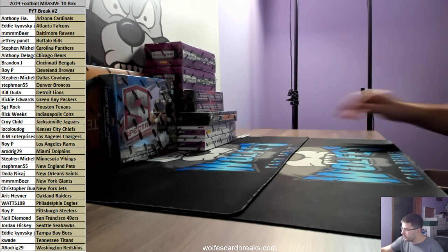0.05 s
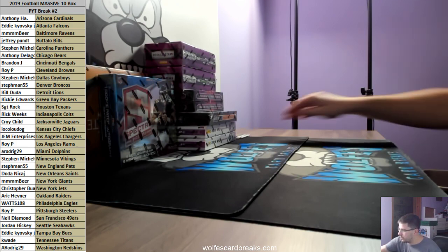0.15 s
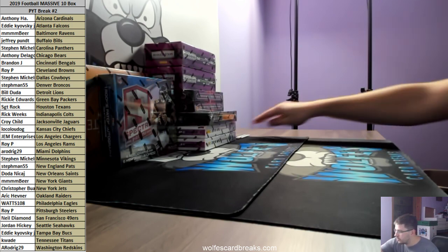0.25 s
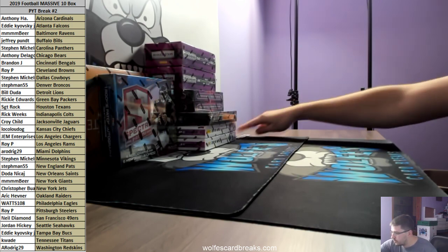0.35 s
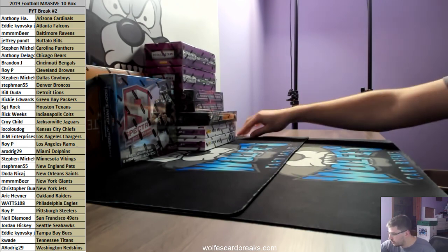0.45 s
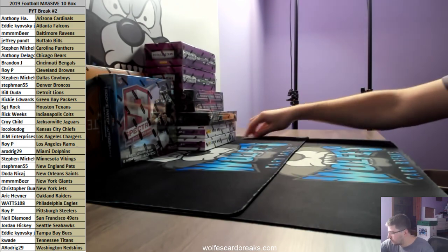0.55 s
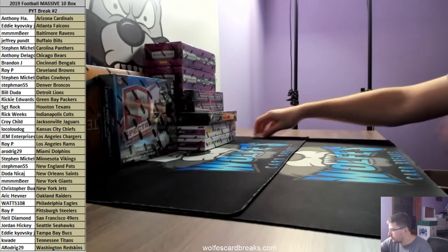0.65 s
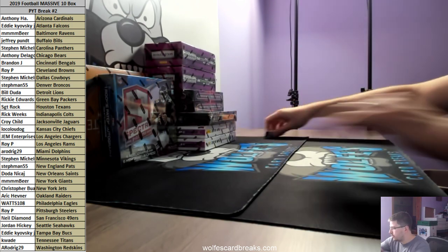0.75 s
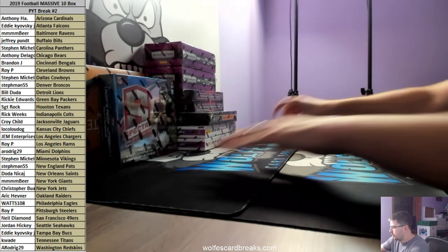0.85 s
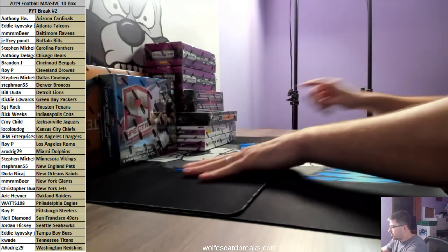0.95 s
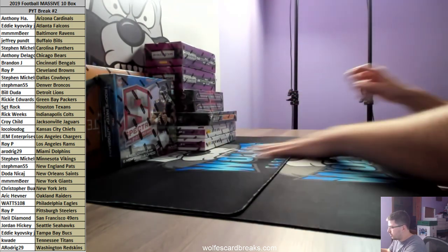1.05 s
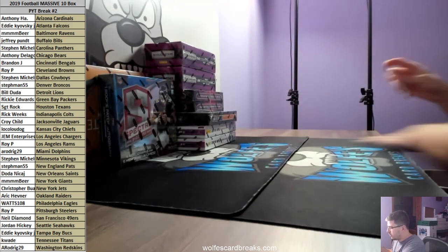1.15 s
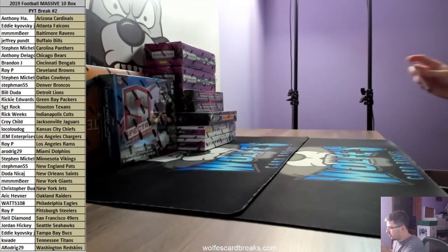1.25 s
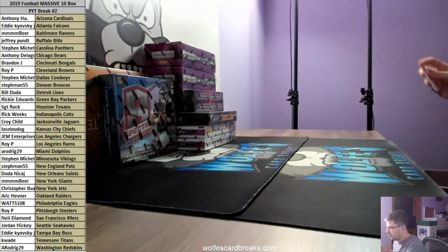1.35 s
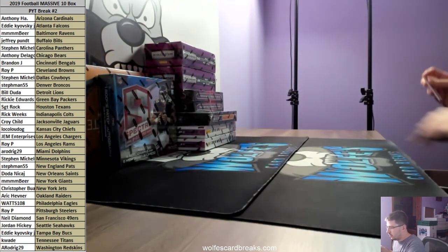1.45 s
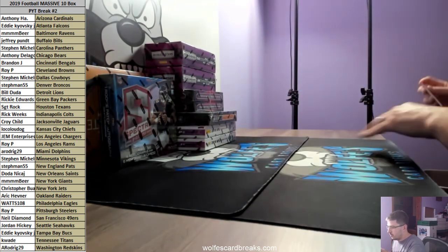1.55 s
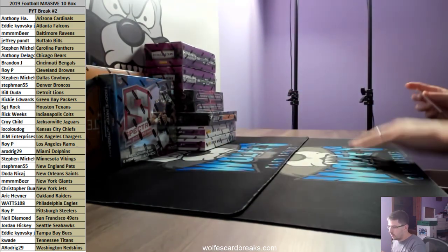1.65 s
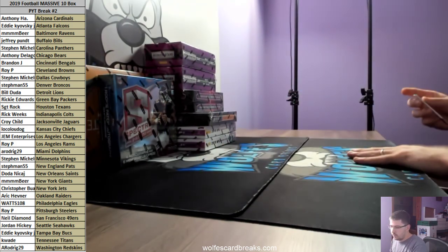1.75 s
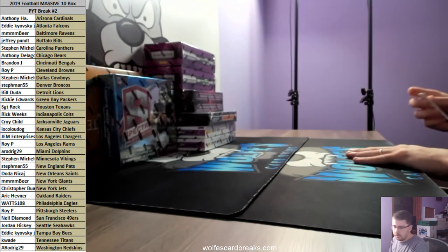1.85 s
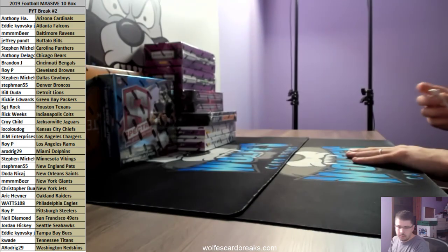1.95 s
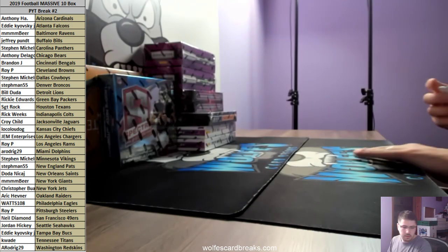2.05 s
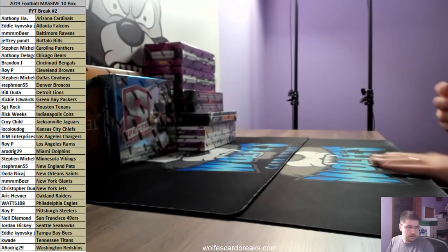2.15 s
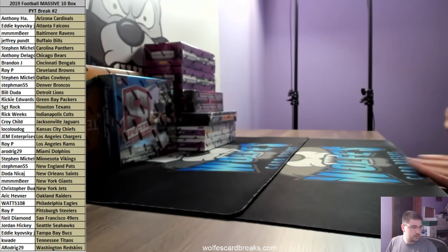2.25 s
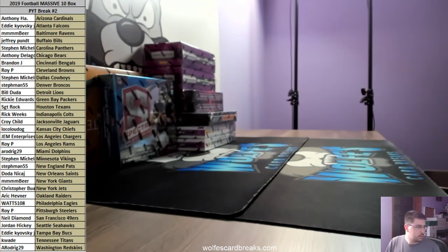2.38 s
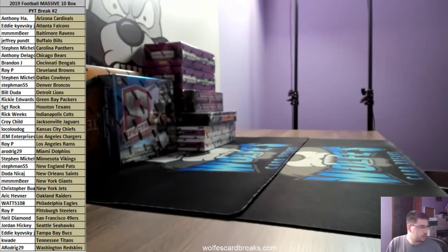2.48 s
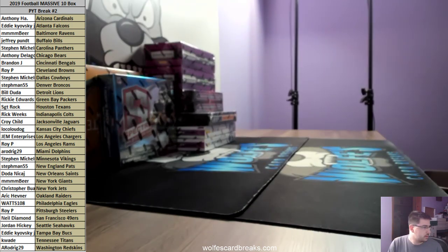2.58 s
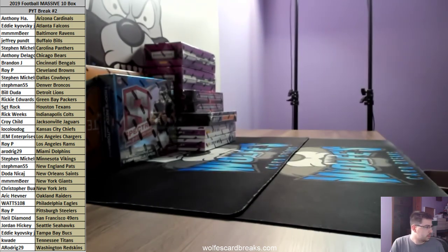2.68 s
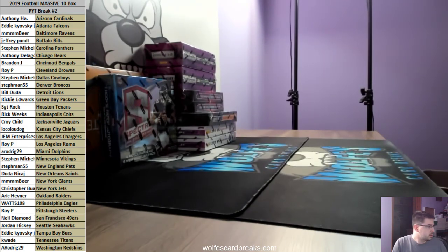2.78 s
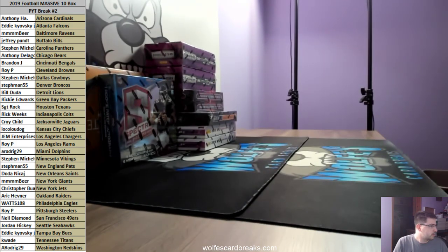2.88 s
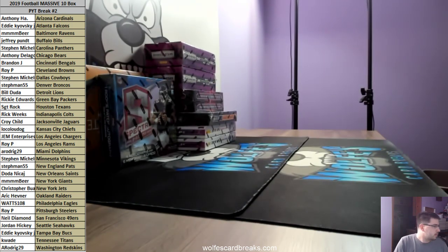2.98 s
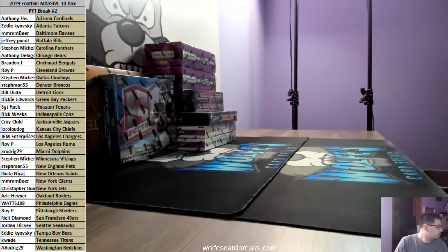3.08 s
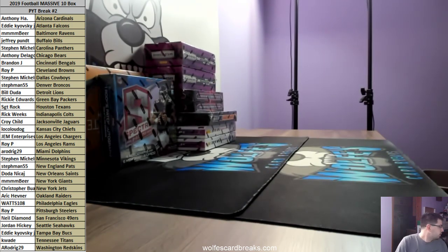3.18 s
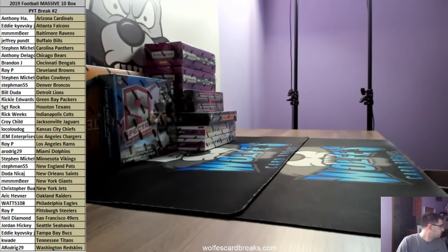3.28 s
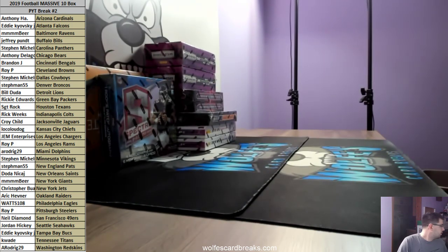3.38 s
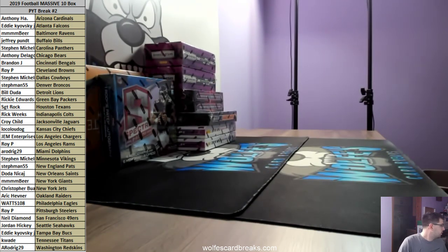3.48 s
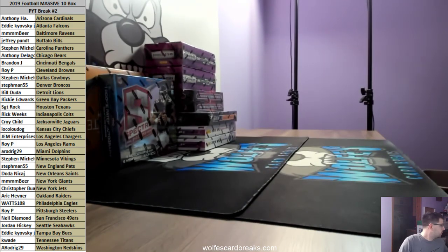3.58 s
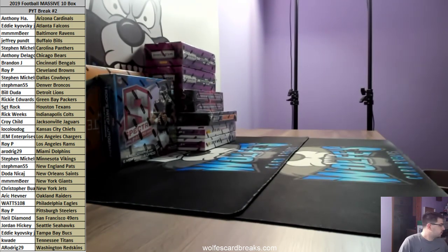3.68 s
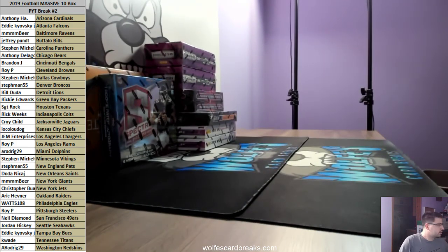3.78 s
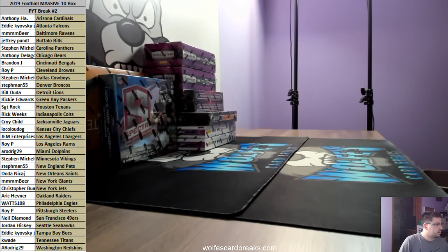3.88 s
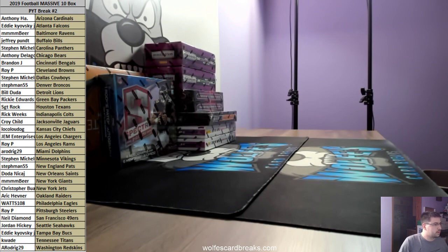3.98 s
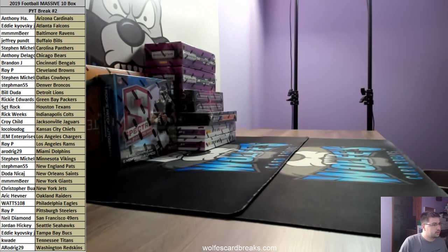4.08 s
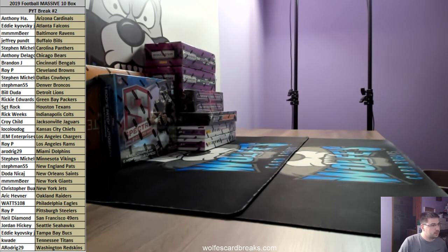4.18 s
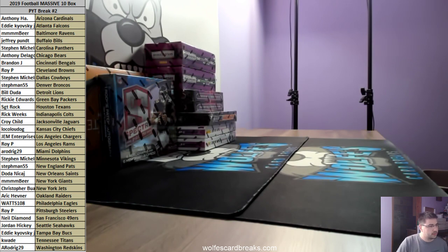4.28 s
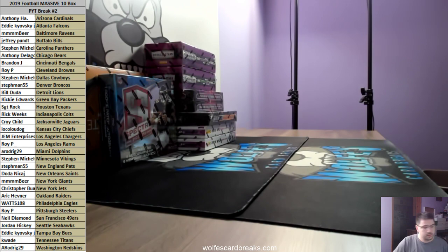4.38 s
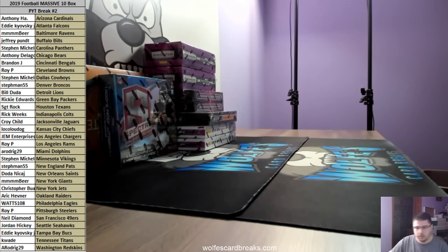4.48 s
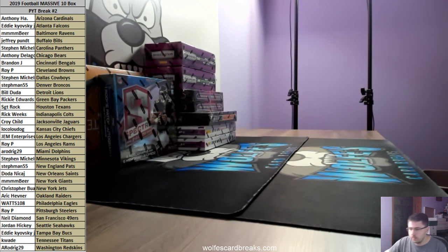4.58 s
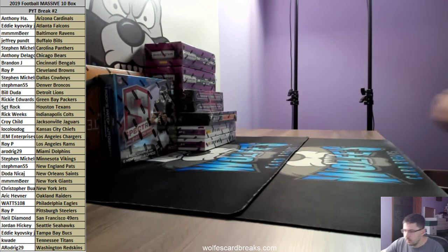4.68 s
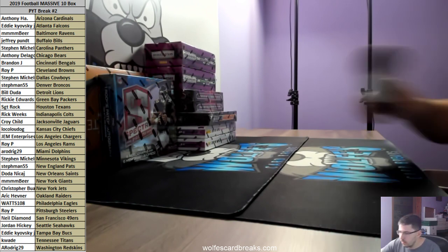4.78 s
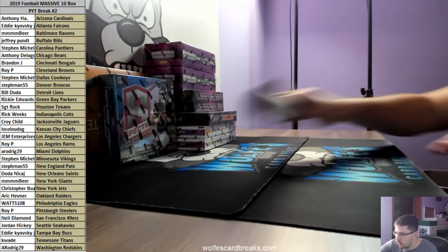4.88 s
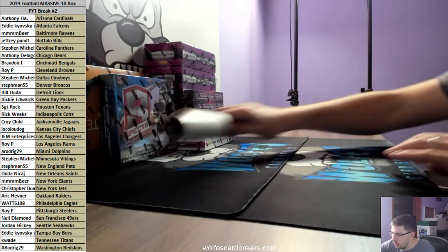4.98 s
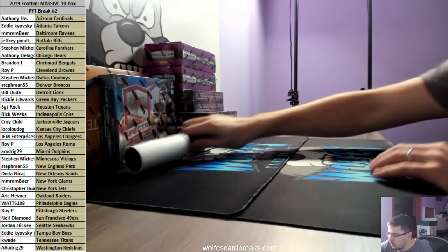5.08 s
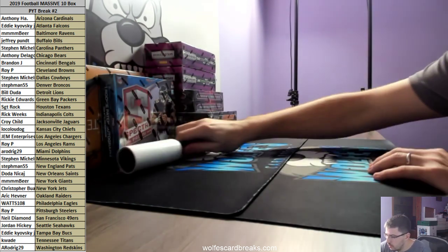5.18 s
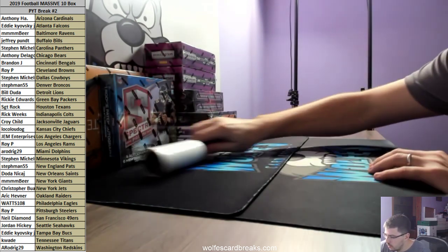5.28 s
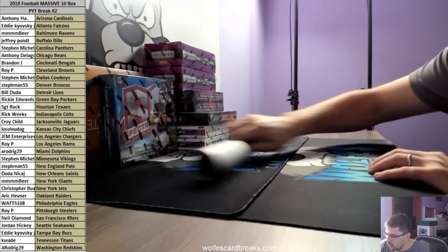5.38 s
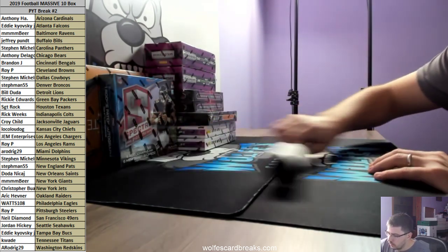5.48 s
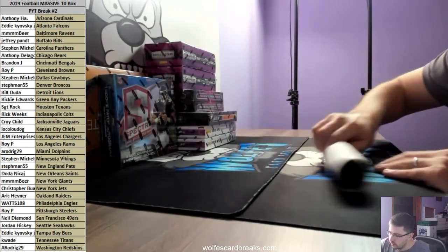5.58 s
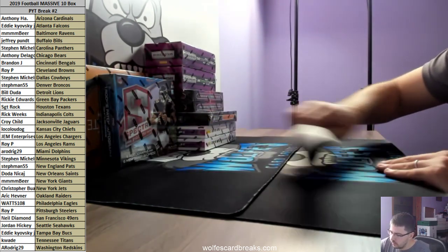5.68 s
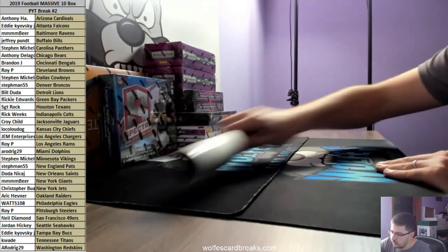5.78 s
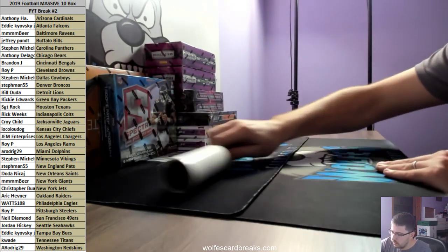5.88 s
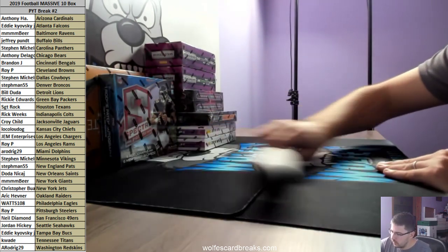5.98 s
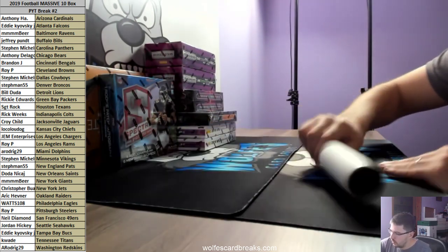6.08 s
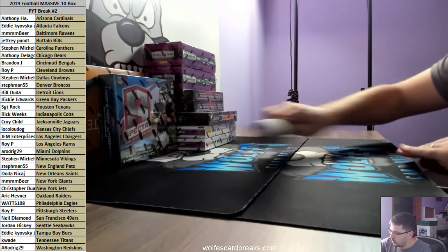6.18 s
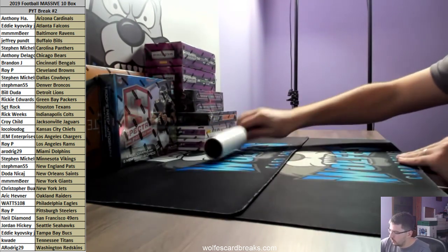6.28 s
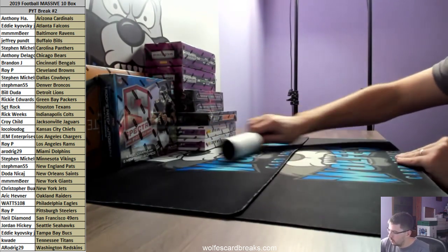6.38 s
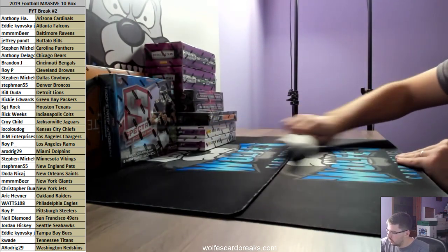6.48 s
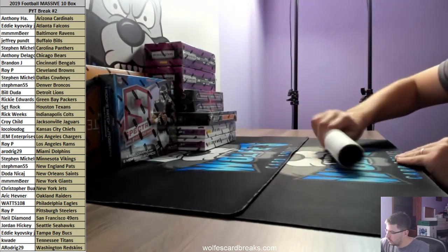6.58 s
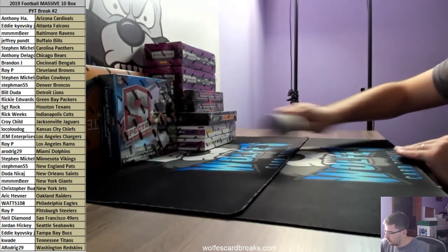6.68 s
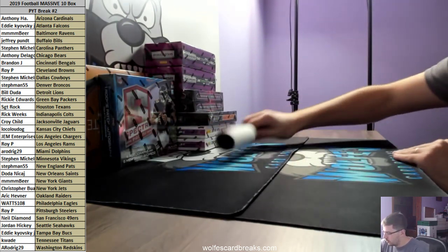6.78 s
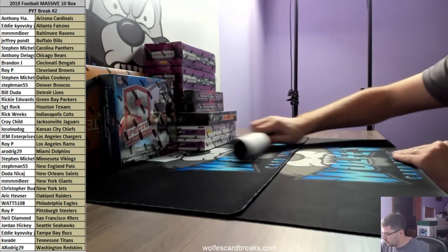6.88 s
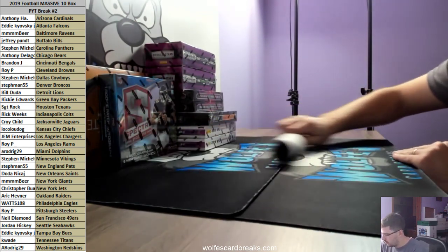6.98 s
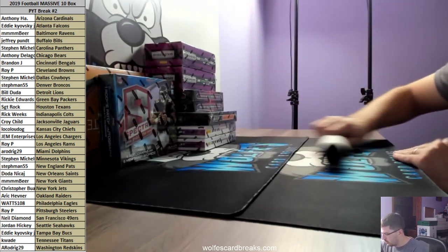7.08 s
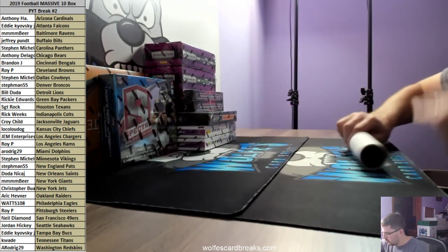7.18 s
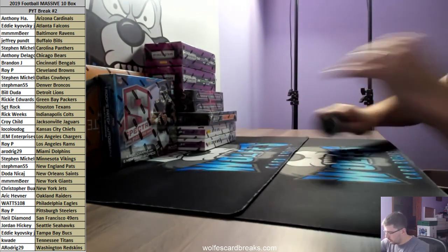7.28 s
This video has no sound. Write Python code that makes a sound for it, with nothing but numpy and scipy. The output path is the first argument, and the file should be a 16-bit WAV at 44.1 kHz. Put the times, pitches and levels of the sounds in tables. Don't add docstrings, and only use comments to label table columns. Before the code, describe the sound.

In a small room with a faint fan hum, hands tidy a cloth mat on a wooden table: light rubs, small ticks, low thumps and one quick palm sweep. After a quieter pause, a sticky roller lands with a clatter and makes four short rasping passes, glue crackling off the cloth, its plastic frame ticking and the table thudding at each bump. A close microphone stands on the table.

```python
import sys
import numpy as np
from scipy import signal
from scipy.fft import rfft, irfft, next_fast_len
from scipy.io import wavfile
from scipy.ndimage import uniform_filter1d

SR = 44100
rng = np.random.default_rng(int(sys.argv[2]) if len(sys.argv) > 2 else 0)


def gain_from_db(level_db):
    decades = np.asarray(level_db, float) / 20
    return 10 ** decades


def digitize_waveform(pressure):
    field = np.atleast_2d(pressure).T
    bounded = np.clip(field, -1, 1)
    quanta = np.round(bounded * 32767).astype(np.int16)
    wavfile.write(sys.argv[1], SR, quanta)


N = 323694


def rms_one(x):
    return x / np.sqrt(np.mean(x ** 2) + 1e-20)


def in_time(rows, silent_db=-110):
    s, *columns = np.transpose(rows)
    now = np.arange(N) / SR
    return [np.interp(now, s, column, left=silent_db, right=silent_db) for column in columns]


def coloured(x, points):
    size = next_fast_len(N)
    hz = np.maximum(np.arange(size // 2 + 1) * SR / size, 1)
    points_hz, points_db = np.array(points).T
    shape_db = np.interp(np.log(hz), np.log(points_hz), points_db)
    return rms_one(irfft(rfft(x, size) * gain_from_db(shape_db), size)[:N])


def band(x, low_hz, high_hz):
    edges = [low_hz, min(high_hz, SR / 2.2)]
    return signal.sosfilt(signal.butter(2, edges, "band", fs=SR, output="sos"), x)


def without_lows(x, edge_hz):
    total, at, half = np.cumsum(x), np.arange(N), SR / edge_hz / 2
    ahead = np.interp(at + half - .5, at, total)
    behind = np.interp(at - half - .5, at, total)
    return x - (ahead - behind) / (2 * half)


def drift(rate_hz):
    r = np.exp(-2 * np.pi * 20 * rate_hz / SR)
    slow = signal.lfilter([1], [1, -2 * r, r * r], rng.standard_normal(N // 20 + 1001))[1000:]
    return np.interp(np.arange(N) / 20, np.arange(len(slow)), rms_one(slow))


def ring(x, hz, t60):
    r, w = gain_from_db(-60 / (t60 * SR)), 2 * np.pi * hz / SR
    return signal.lfilter([0, np.sin(w)], [1, -2 * r * np.cos(w), r * r], x + 1e-18)


def stroke(row, attack_s, sag_db, release_db_per_s, top_db, top_fade_db, rumble_db):
    start, fastest, lift, db, softer_db = row
    let_go_db, settle_db_per_s = 23, 148
    gentle, sagged = db - softer_db, db - sag_db
    settled = sagged - let_go_db
    gone = lift + let_go_db / release_db_per_s
    return [(start, gentle - 18, gentle - 10 + top_db - top_fade_db, rumble_db + 5),
            (start + attack_s, gentle, gentle + top_db, rumble_db),
            (fastest, db, db + top_db, rumble_db),
            (lift, sagged, sagged + top_db, rumble_db),
            (gone, settled, settled + top_db - top_fade_db / 2, rumble_db - 5),
            (gone + 25 / settle_db_per_s, settled - 25, settled - 25 + top_db - top_fade_db, rumble_db - 31)]


def friction(strokes, spectrum, path, per_s, spread_db, clump_db, echo):
    sizes = gain_from_db(spread_db * np.minimum(rng.exponential(1, N), 5)) * rng.choice([-1, 1], N)
    snaps = coloured(sizes * (rng.random(N) < per_s / SR), spectrum)
    at = np.arange(N)
    path_s, path_lag_ms, path_edge_hz = np.transpose(path)
    lag_ms = np.interp(at / SR, path_s, path_lag_ms)
    snaps = without_lows(snaps, np.interp(at / SR, path_s, path_edge_hz))
    late = at - lag_ms * (1 + .035 * drift(10)) * SR / 1000
    dulled = uniform_filter1d(snaps, size=3)
    snaps = snaps + echo * gain_from_db(2 * drift(17)) * np.interp(late, at, dulled)
    snaps = snaps - echo * .4 * np.interp(2.7 * late - 1.7 * at, at, snaps)
    low = signal.sosfiltfilt(signal.butter(2, 5500, fs=SR, output="sos"), snaps)
    curves = [in_time(touch) for touch in strokes]
    hiss_level, top_level = sum(gain_from_db(c[0]) for c in curves), sum(gain_from_db(c[1]) for c in curves)
    hiss = hiss_level * gain_from_db(clump_db * drift(51)) * rms_one(low)
    top = top_level * gain_from_db(clump_db * drift(17)) * rms_one(snaps - low)
    rumble = sum(gain_from_db(c[2] - 6) for c in curves)
    return hiss + top, rumble


# (sets off [s], fastest [s], lifts [s], hiss [dB], softer at the start by [dB])
ROLLER_PASSES = [
    (5.168, 5.439, 5.563, -39.5, 15.5),
    (5.862, 5.978, 6.044, -38, 7),
    (6.318, 6.469, 6.54, -45, 13.5),
    (6.822, 7.024, 7.156, -44.5, 11.5),
]
# (pitch [Hz], level [dB per Hz])
GLUE_COLOUR = [(350, -7), (600, -6), (869, -1), (1010, -6), (1400, 2), (2600, 0), (4460, 0.5), (5400, -2),
               (8860, -0.5), (9890, -6), (14100, -2.5), (16000, -9)]
ROLLER_ECHO_MS = (0.42, 0.822, 1.12)
ROLLER_EDGE_HZ = (2180, 1150, 2020)


def roller_peeling():
    passes = [stroke(row, attack_s=0.027, sag_db=3, release_db_per_s=238, top_db=-0.5, top_fade_db=30,
                     rumble_db=-45.5) for row in ROLLER_PASSES]
    path = [point for row in ROLLER_PASSES for point in zip(row[:3], ROLLER_ECHO_MS, ROLLER_EDGE_HZ)]
    return friction(passes, GLUE_COLOUR, path, per_s=12000, spread_db=2.8, clump_db=1.1, echo=.5)


# (time [s], legs [dB], panel [dB], upper panel [dB], edge [dB])
THUMPS = [(0.386, -63.5, -46.5, -62, -71.5), (0.459, -58, -36, -37, -56), (0.717, -52.5, -38, -50, -50),
          (0.914, -37, -37, -44, -53), (1.709, -40.5, -43.5, -64.5, -72.5), (1.743, -45, -44.5, -70, -72),
          (2.134, -45, -46.5, -67, -66), (2.868, -37, -37, -51, -29.5), (3.082, -41.5, -35, -47, -26),
          (4.442, -76, -92, -44.5, -39), (4.891, -70, -65, -49.5, -61), (5.0805, -42, -28.5, -29.5, -34),
          (5.107, -37.5, -36, -42, -26), (5.316, -64, -34, -39.5, -66.5), (5.335, -44, -37, -37, -72),
          (5.481, -30.5, -27, -7.5, -14), (5.8126, -37.5, -22, -19.5, -33), (5.987, -37, -28.5, -13.5, -24),
          (6.258, -38.5, -42, -38, -35.5), (6.2843, -46, -28.5, -23.5, -36),
          (6.4825, -31, -22.5, -7.5, -11), (6.736, -38, -33, -78, -44), (6.813, -39, -25.5, -23.5, -35),
          (7.0, -32.5, -28, -12.5, -22)]
PART_HZ = (65, 145, 240, 600)
PART_DB = (12, 16.5, 0, 5)
# (pitch [Hz], level [dB], time to fall 60 dB [s])
TABLE_NOTES = [(64.7, -35, 1.7), (145, -1.5, 0.45), (215.7, -3.5, 0.27), (276.3, -7, 0.32),
               (326.2, -12.5, 0.32), (371.7, -18, 0.4), (425.8, -15, 0.27), (515, -18, 0.21),
               (580, -19, 0.058), (798, -22.5, 0.089), (984, -29, 0.13), (1040, -19, 0.055),
               (547, -20, 0.24), (630, -26, 0.19)]
# (lag [s], share [1])
REBOUNDS = [(.0184, .2), (.026, .45), (.0323, .18), (.040, .26), (.043, -.15), (.0545, .17), (.073, .09)]


def table(rumble):
    mat_t60_s = .22
    rows, out = np.array(THUMPS), np.zeros(N)
    at = np.round((rows[:, 0] + .001) * SR).astype(int)
    scatter_db = 1.5 * rng.standard_normal((len(rows), len(TABLE_NOTES)))
    noise = rng.standard_normal(N)
    settling = gain_from_db(-60 / (.22 * SR))
    for k, (hz, level_db, t60) in enumerate(TABLE_NOTES):
        place_db = np.array([np.interp(np.log(hz), np.log(PART_HZ), row + PART_DB) for row in rows[:, 1:]])
        blows = np.zeros(N)
        blows[at] = -gain_from_db(place_db + level_db - 10.5 + scatter_db[:, k])
        judder = gain_from_db(-33.5) * signal.lfilter([1], [1, -settling], blows + 1e-18)
        shaking = np.roll(noise, 997 * k) * (judder + gain_from_db(level_db - 26.5) * rumble)
        out += ring(blows + shaking, hz, min(0.75 * t60, mat_t60_s))
    push = np.zeros(N)
    push[at] = -gain_from_db(rows[:, 3] + 3.5)
    dent = ring(push, 206.5, 0.027)
    out += dent + sum(share * np.roll(dent, round(lag * SR)) for lag, share in REBOUNDS)
    edge = np.zeros(N)
    edge[at] = gain_from_db(rows[:, 4] + 3)
    out -= gain_from_db(-1.5) * ring(edge, 570, 0.016)
    crowd = signal.lfilter([1], [1, -gain_from_db(-60 / (.14 * SR))], edge + 1e-18)
    out += band(noise * crowd, 300, 650)
    return band(out, 107, 770)


def sway(rumble):
    attack_s, t60_s, linger_t60_s, linger_db = 0.011, 0.5, 3.6, -9
    rest_db, from_rumble_db = -69.5, -1.5
    noise = rng.standard_normal((2, N))
    rocking = rms_one(band(ring(noise[0], 66.9, 0.57), 38, 130))
    rocking = rocking + 0.55 * rms_one(band(band(noise[1], 32.6, 60), 24, 78))
    evened = rocking / np.sqrt(uniform_filter1d(rocking ** 2, size=SR // 8) + 0.21)
    power = gain_from_db(rest_db) ** 2 + (gain_from_db(from_rumble_db) * rumble) ** 2
    for s, db, *_ in THUMPS:
        t = np.maximum(np.arange(N) / SR - s, 0)
        dying = gain_from_db(-60 * t / t60_s) + gain_from_db(linger_db - 60 * t / linger_t60_s)
        power = power + (gain_from_db(db) * (1 - np.exp(-t / attack_s)) * dying) ** 2
    return np.sqrt(power) * evened


CONTACT_S = .0004

# (time [s], peak [dB], pitch [Hz], broad crack [dB], tail [dB])
TAPS = [(1.711, -38, 5070, -10, -18), (2.8543, -29, 1490, -7.5, 6.5), (3.075, -24, 3260, -11, -2.5),
        (4.259, -54, 3000, -25, -12), (4.5894, -35, 6500, -20, -25), (4.6468, -49, 2430, -23, -19.5),
        (5.083, -26, 2100, -19, -4), (5.092, -23.5, 2620, -14, -10), (5.1071, -23, 1320, -16, -4),
        (5.192, -27, 3550, -19, -12.5), (5.2, -37, 2500, -17, -3), (5.337, -35, 1640, -24, -1),
        (5.7697, -42, 1950, -35, -7.5), (5.816, -23.5, 2900, -3.5, -14), (5.887, -33.5, 1490, -20, -1),
        (6.483, -18.5, 2480, -15, -7), (6.564, -31, 2820, -26, -20), (6.736, -43, 1860, -20, -6.5),
        (6.8129, -39.5, 3000, -23, 8.5), (7.184, -28, 2626, -32, -23), (7.242, -45, 1920, -30, -7)]
# (time [s], peak [dB], pitch [Hz], broad crack [dB])
RATTLES = [(0.515, -39.5, 1740, -25), (0.863, -52, 3740, -19), (0.9165, -50, 1890, -1),
           (1.278, -46, 2160, -10), (1.279, -38.5, 3400, -14), (1.2795, -39.5, 5840, -28),
           (1.353, -51, 4660, -25), (1.767, -48.5, 6160, -24), (1.94, -56, 1930, -20),
           (2.5247, -54, 6160, -22), (3.851, -46, 2590, -23), (4.4242, -37.5, 3580, -29),
           (4.7028, -41.5, 3120, -24), (4.7637, -40, 4140, -21), (5.4815, -30, 2230, -9),
           (5.712, -44, 1840, -28), (5.8137, -35, 1680, -10), (5.828, -27.5, 3300, -16),
           (5.993, -22, 3200, -20), (6.126, -37.5, 2240, -26), (6.197, -43, 2660, -24),
           (6.2376, -56, 1590, -15), (6.258, -37, 2840, -14), (6.2881, -25.5, 3420, -22),
           (6.294, -34.5, 1900, -12), (6.303, -42, 3000, -12), (6.34, -28.5, 3400, -18),
           (6.769, -50, 3030, -23)]
# (time [s], peak [dB], pitch [Hz], broad crack [dB])
CLINKS = [
    (6.0625, -24, 2070, -12),
    (4.757, -50, 3700, -25),
]
# (time [s], peak [dB], pitch [Hz], broad crack [dB])
KNOCKS = [(0.4712, -45, 846, -17), (4.6812, -52, 570, -9), (5.1082, -38, 951, -16), (5.1242, -36, 831, -20),
          (5.3712, -42.5, 520, -8), (6.0772, -32.5, 893, -20), (6.0962, -49, 860, -16),
          (6.82, -34, 883, -25), (7.1152, -37.5, 870, -8)]
# (ratio to its pitch [1], level [dB])
OVERTONES = [(1.58, -10), (2.4, -13)]


def ticks():
    # tail [dB] where the table has none, then cycles to fall 60 dB
    rows = [(*row, 17.5) for row in TAPS] + [(*row, -10, 34) for row in RATTLES]
    rows += [(*row, -11, 60) for row in CLINKS] + [(*row, -9, 33) for row in KNOCKS]
    out = np.zeros(N + SR)
    t = np.arange(SR // 5) / SR
    rise = 1 - np.exp(-t / CONTACT_S)
    quick = gain_from_db(-60 * t / .007)
    scattering = (1 - gain_from_db(-60 * t / .03)) * gain_from_db(-60 * t / 0.1)
    noise = rng.standard_normal((len(rows), 2, len(t)))
    lags = (rng.uniform(.5, .8, len(rows)) * SR / 1000).astype(int)
    for (s, peak_db, hz, crack_db, tail_db, cycles), (crack, tail), lag in zip(rows, noise, lags):
        body = np.zeros(len(t))
        for ratio, db in [(0.98, 0)] + OVERTONES:
            dying = gain_from_db(db - 60 * t * hz * ratio / cycles)
            body += dying * np.sin(2 * np.pi * min(hz * ratio, SR / 3) * t)
        crack = gain_from_db(crack_db + 10) * band(crack * quick, 1800, 14000)
        near_pitch = 2.01 * band(tail, hz / 4.6, hz * 1.58)
        broad = gain_from_db(crack_db + 1.5) * band(tail, 1100, 7300)
        noisy = crack + gain_from_db(tail_db) * (near_pitch + broad) * scattering
        echo = .6 * np.pad(noisy, (lag, 0))[:len(t)]
        i = round(s * SR)
        out[i:i + len(t)] += gain_from_db(peak_db - 6) * rise * (2 * body + noisy - echo)
    return out[:N]


# (time [s], peak [dB], pitch [Hz], time to fall 60 dB [ms])
PINGS = [(2.8548, -35, 1480, 47), (2.855, -34.5, 1820, 38), (2.858, -37, 950, 43), (2.862, -35, 404, 78),
         (2.855, -35, 7500, 15), (2.869, -31, 1400, 23), (3.075, -33, 980, 45), (3.075, -36.5, 2160, 30),
         (3.075, -33, 3420, 20), (3.0752, -32.5, 4420, 35), (3.075, -40, 5870, 20), (5.084, -31, 4120, 18),
         (5.0842, -38, 5950, 12), (5.092, -35, 2500, 18), (5.1075, -41, 1410, 21), (5.106, -36, 6000, 12),
         (5.112, -34, 1030, 75), (5.1225, -35, 1150, 40), (5.128, -37, 900, 40), (5.141, -42, 1100, 40),
         (6.83, -38, 900, 70), (0.524, -52, 2150, 30), (0.537, -50, 1800, 25), (0.546, -52, 1650, 25),
         (0.566, -56, 1800, 25), (5.1105, -34, 2870, 25), (5.118, -36, 1940, 28), (5.192, -43, 5000, 12),
         (5.192, -47, 6260, 12), (5.606, -37, 1940, 30), (5.604, -46, 910, 90), (5.7118, -48, 2900, 20),
         (5.77, -50, 3200, 13), (5.815, -28, 1780, 19), (5.8164, -27.5, 3130, 18), (5.816, -34, 6800, 10),
         (5.8285, -36, 6000, 18), (5.8285, -46, 9500, 12), (6.063, -33, 3100, 30), (6.2615, -44, 2900, 20),
         (6.283, -38, 2000, 15), (6.288, -33.5, 4230, 20), (6.339, -38, 6200, 18), (6.348, -40, 3500, 20),
         (6.8167, -35.5, 1580, 40), (6.817, -32.5, 2750, 25), (6.816, -32.5, 3670, 25),
         (6.824, -34, 2130, 48), (6.860, -41, 6200, 15), (6.613, -58, 894, 30), (6.738, -47, 1100, 15),
         (6.555, -43, 890, 53), (5.8875, -36, 1470, 30), (7.092, -45, 900, 40), (7.244, -52, 861.5, 50)]
# (time [s], level [dB], lowest pitch [Hz],
# highest pitch [Hz], time to fall 60 dB [ms])
SNAPS = [(5.0815, -44, 1499, 5000, 6), (5.084, -30.5, 1501, 9000, 9.4), (5.0895, -35, 1500, 10000, 5),
         (5.106, -36, 3000, 10000, 8), (5.112, -32, 1000, 6000, 7.4), (5.117, -34, 1000, 5500, 7.9),
         (5.185, -48, 1000, 4000, 8), (5.338, -38, 4000, 12000, 25), (5.4814, -24, 1000, 4800, 8.2),
         (5.8155, -23.5, 9700, 15500, 8.1), (5.988, -37, 900, 5000, 7.2), (6.076, -35, 3000, 8000, 8.7),
         (6.261, -46, 3000, 10000, 8), (6.2945, -39, 2000, 10010, 8), (6.303, -45, 6000, 10000, 7.2),
         (6.8168, -32, 1200, 8900, 12), (3.075, -28, 1200, 9000, 9.8), (2.8548, -39.5, 2200, 5000, 54),
         (5.0922, -31, 1500, 10000, 6), (5.1072, -25, 700, 4500, 4), (5.1918, -41, 1500, 10000, 6),
         (5.2, -44, 1200, 4500, 6), (5.7118, -51.5, 1300, 5500, 9.6), (5.7703, -51, 1500, 8000, 9.1),
         (6.34, -31, 2800, 7000, 7.6), (6.2885, -33, 2500, 5500, 7), (6.197, -46, 1500, 3500, 25),
         (1.7115, -45, 2000, 12000, 8), (5.606, -43, 1200, 3500, 25), (6.3028, -40, 1200, 4000, 7)]


def pings_and_snaps():
    out, t = np.zeros(N + SR), np.arange(SR // 8) / SR
    rise = 1 - np.exp(-t / CONTACT_S)
    sounds = [(s, gain_from_db(db - 60 * 1000 * t / ms) * np.sin(2 * np.pi * hz * t)) for s, db, hz, ms in PINGS]
    noise = rng.standard_normal((len(SNAPS), len(t)))
    for (s, db, low_hz, high_hz, ms), row in zip(SNAPS, noise):
        sounds.append((s, gain_from_db(db - 60 * 1000 * t / ms) * rms_one(band(row, low_hz, high_hz))))
    for s, sound in sounds:
        i = round(s * SR)
        out[i:i + len(t)] += rise * sound
    return out[:N]


# (sets off [s], fastest [s], lifts [s], hiss [dB], softer at the start by [dB])
PALM_SWEEPS = [
    (0.901, 1.108, 1.1454, -47, 8.5),
]
# (pitch [Hz], level [dB per Hz])
PALM_COLOUR = [(410, -50), (700, -24), (1300, 7), (1400, 6), (1920, 6), (4050, 3), (4430, -1.5),
               (9110, -6.5), (15000, -19.5), (16000, -20)]
# (time [s], lag [ms], lowest pitch that escapes [Hz])
PALM_ECHO = [(.9, 0.55, 1500), (1.0, 0.32, 2230), (1.18, 0.266, 4670)]


def palm_sweep():
    sweeps = [stroke(row, attack_s=0.059, sag_db=0.5, release_db_per_s=280, top_db=4.5, top_fade_db=10,
                     rumble_db=-53) for row in PALM_SWEEPS]
    return friction(sweeps, PALM_COLOUR, PALM_ECHO, per_s=14000, spread_db=0.5, clump_db=1.5, echo=0.13)


def rub(row):
    start, end, db, top_db, rumble_db = row
    attack_s, release_db_per_s, top_fade_db = 0.03, 211, 15
    held = np.array([db, db + top_db, rumble_db])
    released = held - 30 - np.array([0, top_fade_db, 0])
    return [(start, *(held - 16)), (start + attack_s, *held),
            (max(end, start + attack_s + .001), *held), (end + 30 / release_db_per_s, *released)]


# (starts [s], lets go [s], rub [dB], top above the rub [dB], rumble into the table [dB])
RUBS = [(0.0, 0.089, -72, -2.5, -61), (0.1, 0.83, -81, -3, -66), (.49, 0.5, -79, -7, -45.5),
        (0.715, 0.68, -71, -1, -46), (1.265, 1.25, -73, 3, -80), (1.705, 1.77, -66.5, -6, -48.5),
        (2.086, 2.16, -64.5, 7, -73), (2.212, 2.268, -62.5, -2, -43.5), (2.673, 2.8, -67.5, -8.5, -52),
        (2.851, 2.88, -53.5, -11, -61), (2.998, 3.04, -60.5, -8, -48), (3.068, 3.12, -51, -8, -51),
        (3.326, 3.3, -83, 1, -60), (3.827, 3.79, -60, -21, -46.5), (4.29, 4.27, -83, 7, -70),
        (4.416, 4.48, -74, -3, -80), (4.56, 4.58, -72, 5.5, -80), (4.63, 4.643, -63.5, -15, -66),
        (4.695, 4.82, -69.5, 3, -69), (4.875, 4.87, -76.5, 2.5, -61), (5.817, 5.9, -74, -12, -44),
        (6.268, 6.37, -54.5, -12, -50), (6.816, 6.94, -49, -13, -60), (6.734, 6.4, -77, -12, -61),
        (7.203, 7.5, -65.5, -14, -84)]
# (pitch [Hz], level [dB per Hz])
SLEEVE_COLOUR = [(290, -8), (500, -16), (553, 3.5), (1260, -1.5), (1550, 3), (3980, -4), (8210, -14.5),
                 (16000, -25)]
# (time [s], lag [ms], lowest pitch that escapes [Hz])
SLEEVE_ECHO = [(0, .3, 500)]


def sleeve_rubs():
    resting_db, resting_rumble_db = -100, -69
    resting = [(s, resting_db, resting_db - 43, resting_rumble_db) for s in (0, N / SR)]
    touches = [rub(row) for row in RUBS] + [resting]
    return friction(touches, SLEEVE_COLOUR, SLEEVE_ECHO, per_s=6000, spread_db=2, clump_db=1.5, echo=0)


# (time [s], length [s], level [dB], pitch [Hz], width [Hz])
DRAGS = [(0.503, 0.086, -59, 1780, 900), (0.1, .7, -80, 7500, 3000), (0.512, .081, -61, 900, 210),
         (2.241, 0.079, -46.5, 260, 41), (2.701, 0.1, -52.5, 300, 74), (2.75, 0.079, -44, 281, 50),
         (3.851, 0.076, -52, 274, 54), (1.051, 0.21, -60.5, 600, 630), (5.111, 0.062, -42.5, 1030, 470),
         (1.985, 0.1, -65.5, 4800, 6200), (1.031, 0.17, -45, 136, 59), (2.131, .085, -45.5, 131, 20),
         (2.085, 0.19, -66, 3940, 570), (2.31, .11, -58.5, 282, 100), (2.871, 0.1, -44.5, 140, 34),
         (3.086, 0.12, -47.5, 146, 42), (4.695, 0.14, -64, 4050, 650), (4.422, .09, -68, 3700, 1000),
         (4.705, 0.13, -64, 6500, 2400), (5.598, 0.023, -44.5, 2040, 1800), (6.1, .12, -50.5, 153, 34),
         (1.918, 0.033, -67.5, 2030, 500), (.462, 0.053, -60, 1070, 1140)]


def drags():
    out = np.zeros(N + SR)
    noise = rng.standard_normal((len(DRAGS), 3 * SR // 4))
    for (s, length, db, hz, width), row in zip(DRAGS, noise):
        phase = np.clip(np.arange(len(row)) / SR / length, 0, 1)
        swell = np.sin(np.pi * np.sqrt(phase))
        i = round(s * SR)
        out[i:i + len(row)] += gain_from_db(db) * swell * rms_one(band(row, hz - width / 2, hz + width / 2))
    return out[:N] * gain_from_db(2.5 * drift(60))


def room(x):
    t60_s = 0.28
    t = np.arange(SR // 2) / SR
    noise = rng.standard_normal(len(t)) * (t > .004)
    dull = band(noise, 460, 7400) * gain_from_db(-60 * t / t60_s)
    bright = band(noise, 3100, 24000) * gain_from_db(-60 * t / (0.53 * t60_s))
    echo = dull + 0.59 * bright
    return signal.fftconvolve(x, echo / np.sqrt(np.sum(echo ** 2)))[:N]


# (pitch [Hz], level [dB per Hz])
AIR_COLOUR = [(12, -33), (20, -4), (65, -1.5), (107, -19.5), (222, -3.5), (328, -17), (542, -11.5),
              (607, -20), (678, -14), (949, -22), (1290, -22.5), (4670, -40.5), (13200, -66), (16000, -81)]
# (pitch [Hz], width [Hz], level [dB])
FAN_HUM = [
    (150.7, 2.6, -71.5),
    (222.8, 6, -63.5),
]


def fan():
    air = gain_from_db(-63.5) * coloured(rng.standard_normal(N), AIR_COLOUR)
    noise = rng.standard_normal(N)
    air += gain_from_db(-91.5) * noise
    return air + sum(gain_from_db(db) * rms_one(ring(noise, hz, 5.3 / width)) for hz, width, db in FAN_HUM)


def scene():
    peeling, roller_rumble = roller_peeling()
    sweeping, palm_rumble = palm_sweep()
    rubbing, sleeve_rumble = sleeve_rubs()
    rumble = roller_rumble + palm_rumble + sleeve_rumble
    airborne = peeling + ticks() + pings_and_snaps() + sweeping + rubbing + drags()
    echoes = gain_from_db(-19.5) * room(airborne)
    heard = airborne + echoes + table(rumble) + sway(rumble) + fan()
    return np.array([heard, heard])


def top_cut(x):
    return signal.sosfilt(signal.butter(12, 16970, fs=SR, output="sos"), x)


def record(dry):
    cut = signal.sosfilt(signal.cheby2(10, 35, 16200, fs=SR, output="sos"), dry)
    return top_cut(cut)


dry = scene()
out = record(dry)
digitize_waveform(out)
```